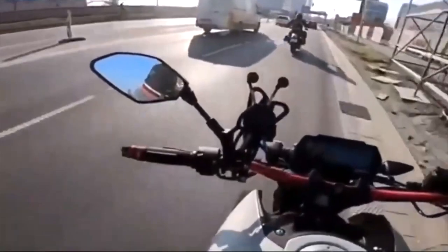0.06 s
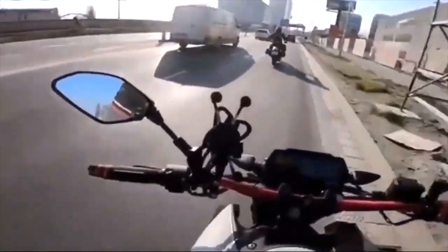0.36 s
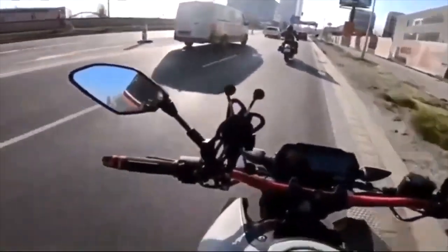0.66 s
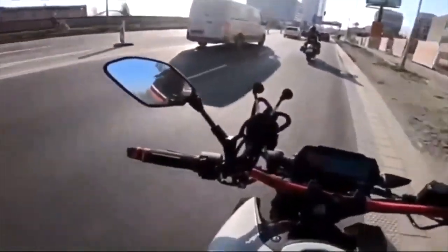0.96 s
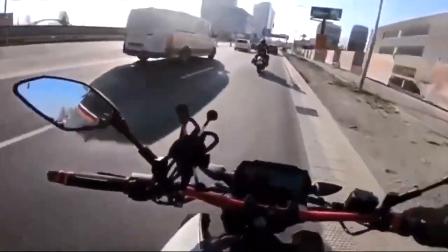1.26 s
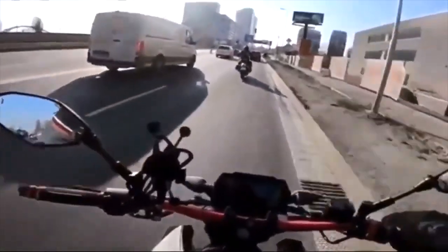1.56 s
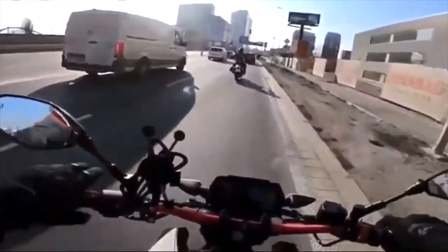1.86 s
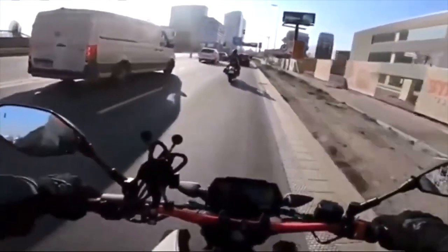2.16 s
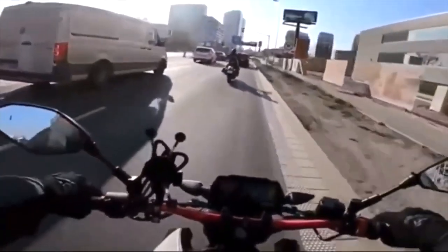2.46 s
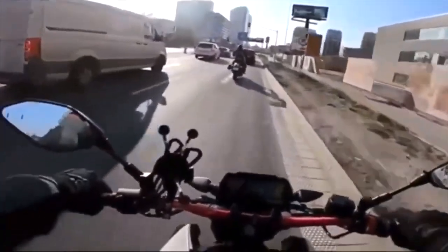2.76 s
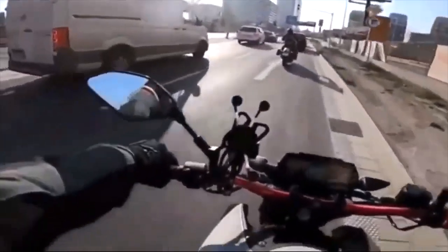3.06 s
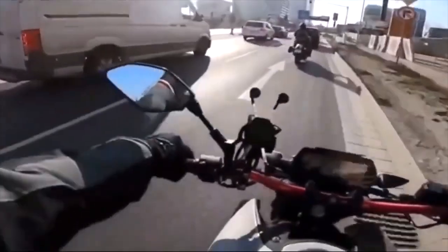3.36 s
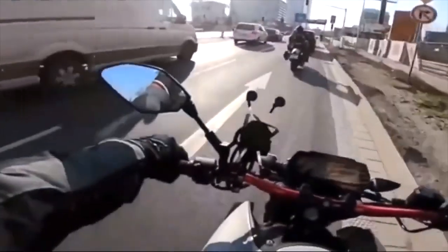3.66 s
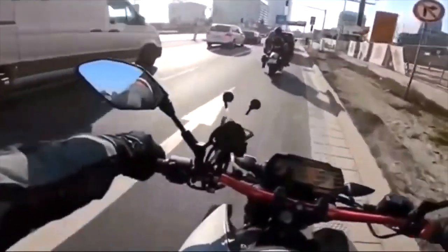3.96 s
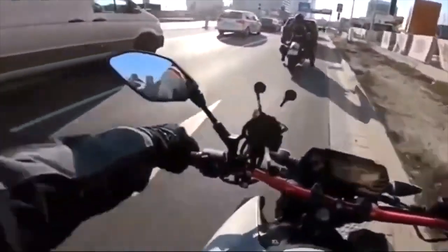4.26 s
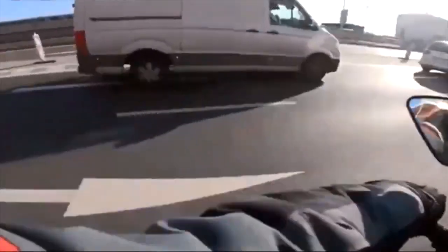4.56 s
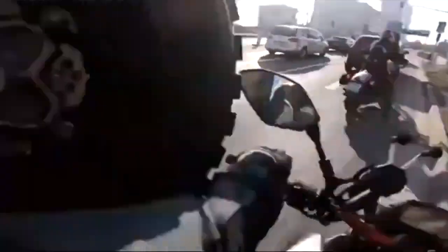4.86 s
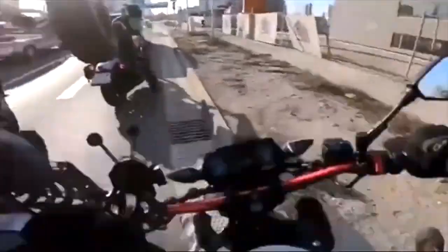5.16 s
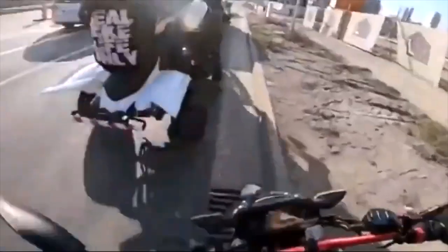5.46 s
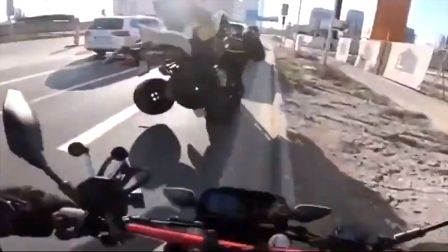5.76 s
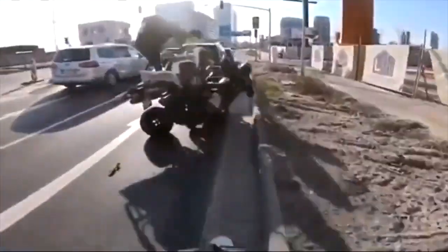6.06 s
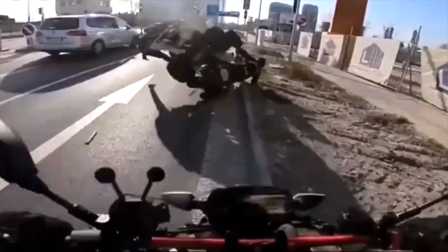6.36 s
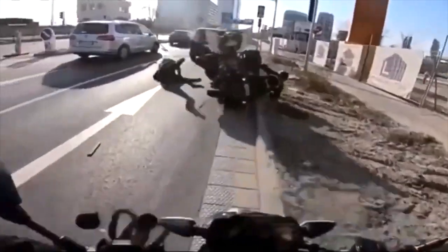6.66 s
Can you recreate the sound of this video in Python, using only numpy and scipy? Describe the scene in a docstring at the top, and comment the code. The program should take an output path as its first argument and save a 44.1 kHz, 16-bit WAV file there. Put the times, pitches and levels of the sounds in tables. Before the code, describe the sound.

A single-cylinder motorcycle is heard close up from the rider's helmet, with low wind buffeting and tyre rush throughout. For nearly four seconds the engine pulls with a throaty bark, its pitch rising and dipping as the throttle opens and briefly eases. At about 2.7 seconds a quick cluster of hollow knocks rings through the chassis. From 3.8 seconds the engine coasts and falls in pitch, with a short blip near 4.7. A grainy brake hiss builds, strongest around 4.9. At 5.4 seconds another bike just ahead is struck, with a thud and a rapid crunch of bodywork. A heavier landing follows near 6 seconds, then scraping and steel grinding on asphalt, with skittering gravel. Small metal parts chink on the road from about 5.7 to 6.8, where one last short scrape comes. Meanwhile the rider's engine sinks to a slow, thumping idle.

```python
"""A single-cylinder motorcycle, heard from the rider's helmet. First it pulls: each firing drives the
resonances of the exhaust, while turbulent air buffets the helmet and the tyres hiss on the asphalt.
The chassis knocks near 2.7 s. From 3.8 s the bike coasts, then brakes with a hiss of friction.
At 5.4 s another bike just ahead is struck, falls and slides, its body ringing under blows and scrapes.
Last, its small parts chink on the road as the rider's engine sinks to a thumping idle."""
import sys
import numpy as np
from scipy import signal
from scipy.fft import rfft, irfft, next_fast_len
from scipy.io import wavfile
from scipy.ndimage import uniform_filter1d

SR = 44100
rng = np.random.default_rng(int(sys.argv[2]) if len(sys.argv) > 2 else 0)


def bounce(signal):
    """Save signal as a 16-bit WAV file at the path given by the first command-line argument."""
    frames = np.transpose(np.atleast_2d(signal))
    limited = np.clip(frames, -1, 1)
    pcm = np.round(limited * 32767).astype(np.int16)
    wavfile.write(sys.argv[1], SR, pcm)


N = 300321
TIME = np.arange(N) / SR


# engine speed: time_s, firing_rate_hz
SPEED = [(0, 28.8), (0.067, 38.5), (0.729, 36.7), (1.099, 44.6), (1.356, 38.61), (1.557, 39.61),
         (1.903, 41.91), (2.347, 41.05), (2.415, 45.2), (2.824, 40.85), (3.187, 39.74), (3.39, 46.32),
         (3.79, 49.86), (3.82, 46.3), (4.139, 44.7), (4.724, 37.08), (4.799, 41.54), (4.944, 37.56),
         (5.38, 29.72), (5.623, 26.29), (5.929, 20.36), (6.272, 9.93), (6.842, 14.61)]
def rotation():
    """Phase is the integral of frequency: the firing rate in Hz and the engine's phase in cycles."""
    speed, = in_time(SPEED)
    return speed, 0.92 + np.cumsum(speed) / SR


# unevenness of the firings: time_s, unevenness_ratio
ROUGHNESS = [(0, .4), (.7, .3), (1.3, .05), (2.6, .12), (2.95, .25), (3.7, .15), (4.6, .06), (4.85, .25),
             (4.96, .04), (5.48, .1), (5.7, .7), (6.1, .2)]
def engine(speed, phase):
    """Source and filter: each firing gives a pulse and a turbulent puff, which excite the resonators."""
    uneven, = in_time(ROUGHNESS)
    firing = strokes(phase, uneven, spread_db=4.0, jitter_s=.0003)
    intake_cycle = np.floor(phase + .38)   # near stalling, a weaker gulp leads each firing
    firing += 0.3 * np.diff(intake_cycle, prepend=intake_cycle[0]) * lugging(speed)
    puff_decay_s = .024
    puff = signal.lfilter([1], [1, -np.exp(-1 / (puff_decay_s * SR))], firing + 1e-18)
    puff *= rng.standard_normal(N)
    churn = uneven ** 1.5 * rng.standard_normal(N)   # lean firings keep the gas churning
    gas = firing + from_db(-33) * (.15 * puff + churn)
    return exhaust(speed, gas, puff) + growl(speed, phase) + clatter(firing) + covers(puff)


def strokes(phase, uneven, spread_db, jitter_s):
    """An impulse train, one click a cycle; lean firings vary in strength and timing."""
    at = np.flatnonzero(np.diff(np.floor(phase)) > 0)
    size, late = rng.standard_normal((400, 2))[:len(at)].T * uneven[at]
    at = np.clip(at + (late * jitter_s * SR).astype(int), 0, N - 1)
    clicks = np.zeros(N)
    clicks[at] = from_db(spread_db * np.minimum(size, 1))
    return clicks


# exhaust response for the low note, before heat shifts it: frequency_hz, coasting_db, pulling_db
NOTE_RESPONSE = [(40.5, -30, -10.5), (62.7, -2.5, 2), (90.5, -5.5, 7.5), (123.2, 0.5, -18),
                 (161.8, 8.5, -14), (171, 6, -4), (204, -8, 5), (329, -10, -14.5), (406, -17, -10),
                 (496, -48, -36), (836, -75.5, -70)]
# the same for the midrange bark: frequency_hz, coasting_db, pulling_db
BARK_RESPONSE = [(290, -31.5, -27.5), (444, 8.5, 5.5), (638, -8.5, 20), (875, -9.5, -2.5),
                 (930, -32.5, -24), (1850, -64.5, -57.5)]
# spectrum of the rasping gas: frequency_hz, density_db
RASP = [(900, -13.5), (1900, 2), (3200, -15), (5200, -12), (8500, -44.5)]
def exhaust(speed, gas, puff):
    """Pipe resonance follows the gas temperature, while the silencer's chamber keeps its pitch."""
    throttle, note_db, bark_db, warmth = load(speed)
    heat = warmth * (speed / 43) ** 0.14   # the pipe cools towards idle
    heat *= (np.maximum(speed, 33) / 43) ** (0.64 * throttle)   # under throttle it climbs with speed
    note = evened(duct(gas, NOTE_RESPONSE, throttle, heat), span_s=0.2)
    bark = evened(duct(gas + from_db(-37) * puff, BARK_RESPONSE, throttle, heat), span_s=.25)
    rasp = from_db(-24.5) * coloured(puff, RASP)
    chamber = from_db(7.8) * evened(ring(soften(gas, hz=426), hz=285.6, width_hz=49), span_s=0.33)
    return from_db(note_db) * note + from_db(bark_db) * (bark + rasp + chamber)


def duct(pulses, response, throttle, heat):
    """Two minimum-phase filters, blended by the throttle; sound is faster in hot gas, so pitch rises."""
    hz, *states_db = np.transpose(response)
    size = 2 * next_fast_len(N)
    clock, own_time = np.cumsum(heat), np.arange(size)   # warped time scales every resonance by heat
    spectrum = 0
    for db, share in zip(states_db, (1 - throttle, throttle)):
        log_gain = np.log(gain_curve(hz, db, size))
        cepstrum = irfft(log_gain)[:size // 2]
        causal = np.exp(rfft(2 * cepstrum, size) - log_gain.mean())
        drive = np.interp(own_time, clock, soften(pulses * share, hz=2440), right=0)
        spectrum += causal * rfft(drive)
    return np.interp(clock, own_time, irfft(spectrum))


CRUISE_HZ, LOAD_CHANGE_S = 40, 0.082
# the throttle opens: start_s, end_s, opening_ratio, note_gain_db, bark_gain_db
PULLS = [(0.068, 0.79, 0.69, 5.5, 5.5), (0.781, 1.16, 0.87, 5.5, 9.5), (1.538, 1.628, 1, -4, -11.5),
         (1.639, 2.718, 0.84, 4.5, 9.5), (2.715, 3.007, 0.47, 6, 0), (3.072, 3.83, 0.76, 5, 12.5),
         (4.721, 4.925, 1, 5.5, 6), (5.512, 5.906, 0.61, 2.5, -5)]
# throttle shut, the rear wheel drives the engine: start_s, end_s, note_gain_db, bark_gain_db
OVERRUNS = [(1.169, 1.517, 5, 10), (3.824, 4.711, 9, 8), (4.92, 5.267, 9.5, -4), (5.278, 5.478, 5.5, -12),
            (5.905, 6.194, 6, 0)]
def load(speed):
    """Radiated level follows speed and load: throttle, note level, bark level and pipe warmth."""
    octaves = np.log2(speed / CRUISE_HZ)
    note_db, bark_db = -21 + 5 * octaves, -43 + 3.5 * octaves
    throttle, warmth = 0, 1
    sag_db_per_s, growth_db_per_s, cooling_per_s = 5.5, 8, 0.12
    for start, end, opening, note_gain_db, bark_gain_db in PULLS:
        on = held(start, end)
        throttle += on * opening
        note_db += on * note_gain_db
        bark_db += held(start, end, rise_s=0.15) * (bark_gain_db - sag_db_per_s * (TIME - start))
    for start, end, note_gain_db, bark_gain_db in OVERRUNS:
        on = held(start, end)
        warmth += on * (0.061 - cooling_per_s * (TIME - start))
        note_db += on * note_gain_db
        bark_db += on * (bark_gain_db + growth_db_per_s * (TIME - start))
    # the throttle never shuts fully; near stalling the idle valve opens and the engine thumps
    throttle = np.clip(np.maximum(throttle, 0.11) + 0.43 * lugging(speed), 0, 1)
    return throttle, note_db + 11.7 * lugging(speed), bark_db, warmth


def lugging(speed, below_hz=15.68):
    """A soft threshold: 0 in normal running, 1 near stalling."""
    return np.clip((below_hz - speed) / 2, 0, 1)


# swells of engine growl, both pulling and coasting: centre_s, length_s, centre_pitch_hz, level_db
GROWLS = [(0.368, 0.23, 634, -23.5), (0.921, 0.23, 563, -17.5), (1.814, 0.44, 756, -25.5),
          (3.319, 0.43, 802, -20.5), (3.62, 0.5, 585, -21.5), (4.455, 0.29, 693, -21.5),
          (4.828, 0.14, 616, -20.5), (5.105, 0.35, 493, -16), (5.775, 0.33, 310, -9.5)]
def growl(speed, phase, rise_s=0.0014, ring_s=0.0066):
    """Damped oscillation: each intake stroke rings the airbox, at a pitch that glides with the engine."""
    age = phase % 1 / speed
    strength = from_db(1.8 * rng.standard_normal(400))[phase.astype(int)]
    tone = 0
    for centre, length, hz, db in GROWLS:
        pitch = hz * (speed / np.interp(centre, TIME, speed)) ** 1.1
        swell = from_db(db) * np.cos(np.pi * np.clip((TIME - centre) / length, -.5, .5))
        tone += swell * np.sin(2 * np.pi * pitch * age)
    return tone * strength * np.exp(-age / ring_s) * (1 - np.exp(-age / rise_s))


# spectrum of the drivetrain's clatter: frequency_hz, density_db
CLATTER_SPECTRUM = [(450, 8.5), (760, -13), (1080, -4), (1550, -13), (7000, -51)]
def clatter(firing, ring_s=0.0064):
    """Impulse response: every firing rings the casing's dense modes and shakes up a loose rattle."""
    age = TIME[:SR // 20]
    fade = age * np.exp(-age / ring_s)
    casing = signal.fftconvolve(firing, fade * rng.standard_normal(len(age)))[:N]
    rattle = signal.fftconvolve(firing, fade)[:N] * rng.standard_normal(N)
    hard_braking = held(4.8, 5.36)
    return from_db(-49.5 + 16 * hard_braking) * coloured(.5 * casing + rattle, CLATTER_SPECTRUM)


# modes of the engine covers: pitch_hz, width_hz, level_db
COVER_MODES = [(1240, 350, 7), (1910, 130, 0), (2533, 180, -3), (4900, 500, -6.5)]
def covers(puff):
    """Forced vibration: gears and valves keep the thin covers ringing, harder at each firing."""
    ringing = sum(from_db(db) * rms_one(resonate(resonate(puff, hz, width), hz, width))
                  for hz, width, db in COVER_MODES)
    return from_db(-60 + 2 * drift(rate_hz=10)) * rms_one(ringing)


# blows on the bodywork: start_s, panel_db, crack_db, decay_s
BLOWS = [(5.412, -52, -27.5, 0.1), (5.43, -19, -39, 0.1), (5.444, -27, -40, 0.075),
         (5.466, -22, -44, 0.067), (5.51, -19, -55, 0.058), (5.522, -44, -35.5, 0.085),
         (5.746, -38, -36.5, 0.039), (5.953, -37, -38, 0.17), (5.963, -32, -39.5, 0.068),
         (5.99, -34, -48, 0.051), (6.134, -48, -44, 0.068)]
# modes of the bodywork: pitch_hz, width_hz, level_db
PANEL_MODES = [(334, 64, 16.5), (504, 130, 9.5), (858, 52, 2.5), (1025, 77, 7), (1217, 246, 0),
               (1840, 81, -9)]
# modes of steel parts grinding on asphalt: pitch_hz, width_hz, level_db
STEEL_MODES = [(1706, 37, 5), (1870, 39, 6), (2850, 92, -3), (4780, 150, -4)]
# gritty crunch of the crash, with the microphone's treble dip and 12.5 kHz peak: frequency_hz, density_db
GRIT = [(1200, 11.5), (2500, 3), (5600, -2.5), (6600, -11), (7600, -18.5), (10400, -39), (12400, -11.5),
        (14000, -18.5), (16000, -47)]
def crash():
    """Impact and friction: blows and sliding shower the falling bike with tiny contacts and fractures."""
    panel, grit, steel = sliding()
    for start, panel_db, crack_db, decay_s in BLOWS:
        blow = burst(start, decay_s)
        panel += from_db(panel_db) * blow
        grit += from_db(crack_db) * blow
    contacts = grains(per_s=5800, spread_db=0.0)
    catching = from_db(2.5 * drift(rate_hz=70))
    bodywork = rubbed(contacts, catching * panel, PANEL_MODES)
    grinding = rubbed(contacts, catching * steel, STEEL_MODES)
    crunch = grit * catching * coloured(contacts + 7.2 * rng.standard_normal(N), GRIT)
    return bodywork + grinding + crunch + thuds(contacts) + grit * gravel() + chinks()


# bodywork scrapes along the road: start_s, end_s, panel_db, grit_db, steel_db
SCRAPES = [(5.431, 5.562, -29, -41.5, -62), (5.949, 6.003, -25, -38, -36.5),
           (6.027, 6.265, -35, -45, -46.5), (6.744, 6.81, -37, -41.5, -54)]
def sliding(sag_db_per_s=6.5):
    """Sliding friction as panel, grit and steel gains: a quiet slide, and scrapes that bite and ease."""
    on_road = TIME > SCRAPES[0][0]
    panel, grit, steel = from_db(-41) * on_road, from_db(-53) * on_road, 0
    for start, end, panel_db, grit_db, steel_db in SCRAPES:
        sag = from_db(-sag_db_per_s * np.maximum(TIME - start, 0))
        bite = held(start, end, rise_s=0.031, fall_s=0.13) * sag
        panel = np.hypot(panel, from_db(panel_db) * bite)
        grit = np.hypot(grit, from_db(grit_db) * bite)
        steel += from_db(steel_db) * bite
    return panel, grit, steel


def rubbed(contacts, gain, modes):
    """Modal superposition: contacts ring a body's modes, in alternating polarity; rms 1 at gain 1."""
    def body(force):
        return sum((-1) ** k * from_db(db) * resonate(force, hz, width)
                   for k, (hz, width, db) in enumerate(modes))
    return body(contacts * gain) / np.std(body(contacts))


# heavy landings of the falling bike: start_s, level_db
THUDS = [(5.424, -24.5), (5.96, -17.5)]
# modes of the frame and tank: pitch_hz, width_hz, level_db
FRAME_MODES = [(150, 21, 9.5), (307, 81, 6.5), (397, 190, -9.5)]
def thuds(contacts):
    """Impact excitation: the bike's weight lands and the frame's low modes boom."""
    force = sum(from_db(db) * burst(start, decay_s=0.55) for start, db in THUDS)
    return rubbed(contacts, force, FRAME_MODES)


def gravel():
    """Shot noise: gravel and fragments skitter, each size with its own brief resonance."""
    stones = sum(resonate(grains(per_s=120, spread_db=7.0), hz, width_hz=120)
                 for hz in rng.uniform(2300, 6200, size=12))
    return from_db(-11.0) * rms_one(stones)


# small metal parts landing: start_s, pitch_hz, peak_db, decay_s
CHINKS = [(5.701, 6000, -44, 0.022), (5.862, 4950, -36.5, 0.035), (6.11, 5810, -39, 0.096),
          (6.416, 4600, -36.5, 0.06), (6.434, 4090, -39, 0.046), (6.47, 4250, -41, 0.05),
          (6.685, 1010, -35, 0.042), (6.745, 2535, -33, 0.069), (6.748, 5400, -34.5, 0.03)]
def chinks():
    """Free vibration: shed metal parts land, chatter and ring."""
    return struck_parts(CHINKS, detune=0.05, rattle_db=-8)


# knocks while riding: start_s, pitch_hz, peak_db, decay_s
KNOCKS = [(2.722, 277.6, -9.5, 0.55), (2.747, 249, -11.5, 0.28), (2.775, 288, -10, 0.2),
          (2.806, 1300, -33, 0.071), (2.833, 1200, -30.5, 0.049)]
def knocks():
    """Structure-borne sound: clean knocks ring through the chassis."""
    return struck_parts(KNOCKS, detune=0.059, rattle_db=-48.0)


def struck_parts(rows, detune, rattle_db):
    """Beating: a click and a brief rattle ring a close pair of modes in each part."""
    out = np.zeros(N)
    age = TIME[:SR // 4]
    for start, hz, db, decay_s in rows:
        touch = from_db(rattle_db) * rng.standard_normal(len(age)) * np.exp(-age / (60 / hz))
        touch[1] = 1
        width = np.log(1000) / (np.pi * decay_s)   # 60 dB down in the decay time
        pair = ring(touch, hz * (1 - detune / 2), width) + ring(touch, hz * (1 + detune / 2), width)
        at = int(start * SR)
        out[at:at + len(age)] += (from_db(db) * pair / np.abs(pair).max())[:N - at]
    return out


# echo from the street walls: delay_s, gain_db
STREET_ECHOES = [(0.018, -13)]
def street(sound):
    """Reflection: the direct sound is joined by a delayed, duller copy."""
    echoes = sum(from_db(db) * np.interp(TIME - delay, TIME, sound, left=0)
                 for delay, db in STREET_ECHOES)
    return sound + soften(echoes, hz=5000)


# levels of air and road noise: time_s, buffet_db, rush_db
AIR = [(0, -18.5, -41.5), (2.65, -20, -43.5), (2.85, -19.5, -41), (3.6, -18, -40.5), (3.95, -22, -49),
       (4.6, -22, -41), (5.1, -20.5, -36.5), (5.7, -23, -47), (6.81, -21.5, -41)]
# spectrum of wind on the helmet: frequency_hz, density_db
BUFFET = [(20, -14), (45, -3), (90, 7), (180, 4), (600, -19.5), (1200, -73)]
# spectrum of the road rush: frequency_hz, density_db
RUSH = [(300, -3), (700, 2), (1250, -1), (2000, -13), (3000, -23.5), (4000, -24), (5000, -24), (6000, -32),
        (7200, -45), (9000, -53)]
def air_and_road(phase):
    """Turbulence buffets the helmet; the tyres give a smooth rush that slowly swells and fades."""
    buffet_db, rush_db = in_time(AIR)
    buffet = from_db(buffet_db + 0.17 * drift(rate_hz=47)) * coloured(rng.standard_normal(N), BUFFET)
    rush_db += 0.1 * np.cos(2 * np.pi * (phase - .15))
    return buffet + from_db(rush_db) * coloured(rng.standard_normal(N), RUSH)


# hiss of braking: time_s, level_db
BRAKING = [(4.15, -80.5), (4.36, -63.5), (4.55, -54), (4.78, -54), (4.88, -45.5), (5.12, -50), (5.23, -57),
           (5.7, -59.5), (6.3, -60)]
# brake hiss near 5 kHz, with the microphone's treble dip and peak: frequency_hz, density_db
HISS_SPECTRUM = [(1500, -15), (3200, -5), (4900, 2), (6000, -10), (7300, -19.5), (10500, -37.5),
                 (12700, -24.5), (16000, -39)]
def brakes():
    """Friction noise: pads and tyres give a grainy, flickering hiss."""
    level_db, = in_time(BRAKING)
    gain = from_db(level_db + 2.0 * drift(rate_hz=35))
    return gain * coloured(grains(per_s=9800, spread_db=3.0), HISS_SPECTRUM)


def from_db(db):
    """Decibels to amplitude ratio."""
    return 10 ** (np.asarray(db) / 20)


def rms_one(x):
    """Normalisation to unit power."""
    return x / np.sqrt(np.mean(x ** 2) + 1e-20)


def evened(x, span_s):
    """Normalisation to unit power over a moving window."""
    size = int(span_s * SR)
    power = uniform_filter1d(uniform_filter1d(x * x, size), size)
    return x / np.sqrt(np.abs(power) + 1e-14)


def in_time(rows):
    """Linear interpolation in time, one curve per column."""
    times, *columns = np.transpose(rows)
    return [np.interp(TIME, times, column) for column in columns]


def held(start, end, rise_s=LOAD_CHANGE_S, fall_s=LOAD_CHANGE_S):
    """A trapezoidal envelope, its ramps centred on start and end."""
    return np.clip((TIME - start) / rise_s + .5, 0, 1) * np.clip((end - TIME) / fall_s + .5, 0, 1)


def burst(start, decay_s, rise_s=0.0096):
    """Exponential decay after a quick rise: 60 dB down in the decay time."""
    age = TIME - start
    return np.clip(age / rise_s + .5, 0, 1) * from_db(-60 * np.clip(age / decay_s, 0, 4))


def drift(rate_hz):
    """Random modulation with a spread near 1."""
    return np.interp(TIME * rate_hz, np.arange(4000), rng.standard_normal(4000))


def grains(per_s, spread_db):
    """A Poisson process of clicks, their sizes scattered by spread_db; rms 1."""
    sizes = from_db(spread_db * np.minimum(rng.exponential(1, N), 4)) * rng.choice([-1, 1], N)
    return rms_one(sizes * (rng.random(N) < per_s / SR))


def gain_curve(hz, db, size):
    """Magnitude response on an FFT grid, falling 12 dB an octave below the first point."""
    grid = np.maximum(np.arange(size // 2 + 1) * SR / size, 1)
    return from_db(np.interp(np.log(grid), np.log(hz), db)) * np.minimum(grid / hz[0], 1) ** 2


def coloured(x, spectrum):
    """Spectral shaping of a white signal; rms 1."""
    hz, db = np.transpose(spectrum)
    size = next_fast_len(N + 8192)
    return rms_one(irfft(rfft(x, size) * gain_curve(hz, db, size), size)[:N])


def soften(x, hz):
    """Second-order low-pass."""
    return signal.sosfilt(signal.butter(2, hz, fs=SR, output="sos"), x)


def resonate(x, hz, width_hz):
    """Band-pass resonance with a peak gain of 1."""
    r, angle = np.exp(-np.pi * width_hz / SR), 2 * np.pi * hz / SR
    feedback = [1, -2 * r * np.cos(angle), r * r]
    return signal.lfilter(np.array([1, 0, -1]) * (1 - r * r) / 2, feedback, x + 1e-18)


def ring(x, hz, width_hz):
    """A damped oscillator that a click sets swinging as a sine; peak gain 1."""
    r, angle = np.exp(-np.pi * width_hz / SR), 2 * np.pi * hz / SR
    feedback = [1, -2 * r * np.cos(angle), r * r]
    return signal.lfilter([0, 2 * (1 - r) * np.sin(angle)], feedback, x + 1e-18)


def scene():
    """Superposition: the rider's own bike, air and road, and the crash just ahead."""
    speed, phase = rotation()
    return (engine(speed, phase) + air_and_road(phase) + brakes() + knocks() + street(crash()))[None]


def record(dry, ceiling=0.94, cutoff_hz=15700):
    """Soft saturation rounds the peaks; a steep low-pass cuts the highest treble."""
    rounded = ceiling * np.tanh(dry * 0.92 / ceiling)
    return signal.sosfilt(signal.ellip(10, .1, 80, cutoff_hz, fs=SR, output="sos"), rounded)


dry = scene()
out = record(dry)
bounce(out)
```